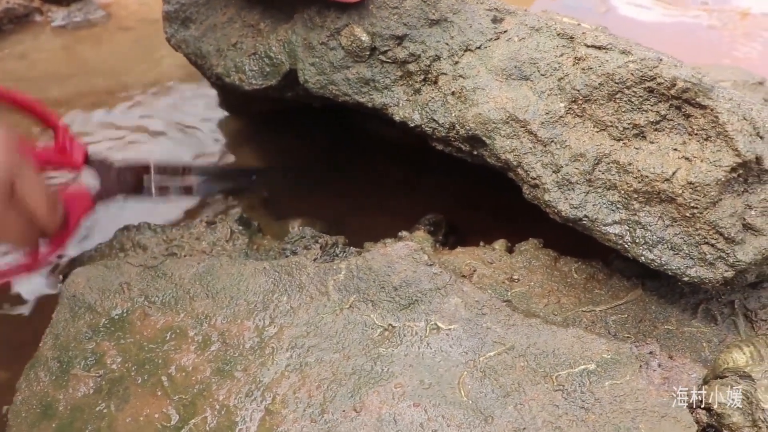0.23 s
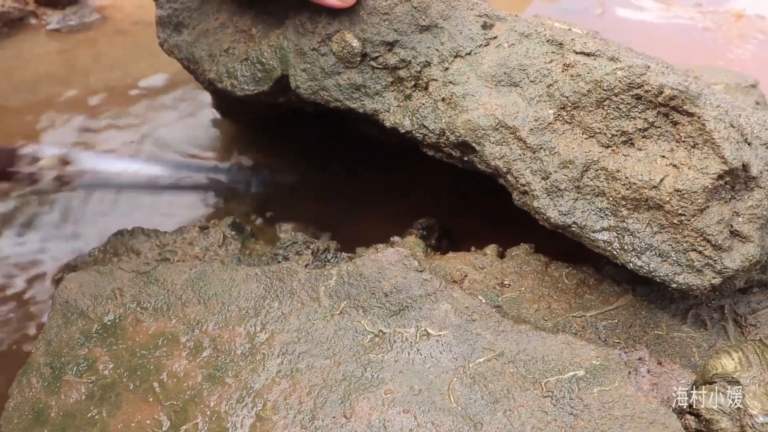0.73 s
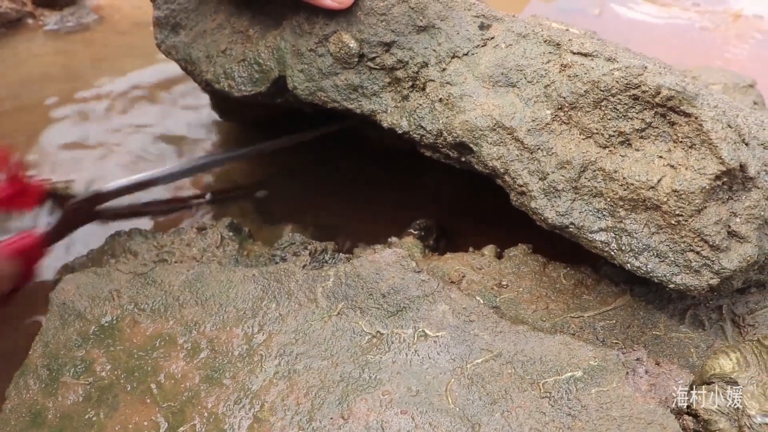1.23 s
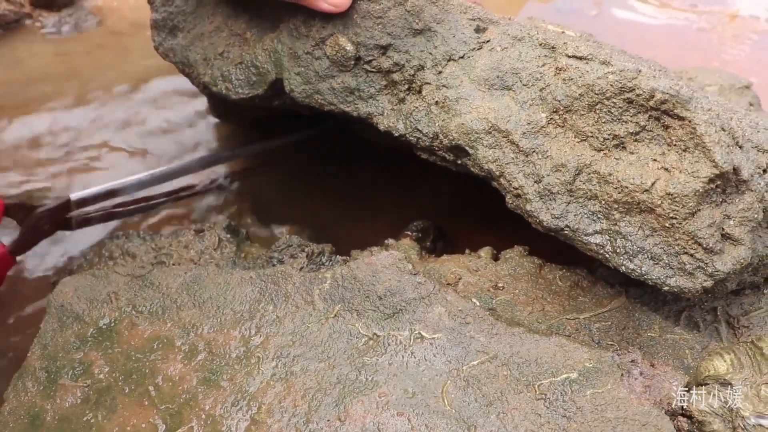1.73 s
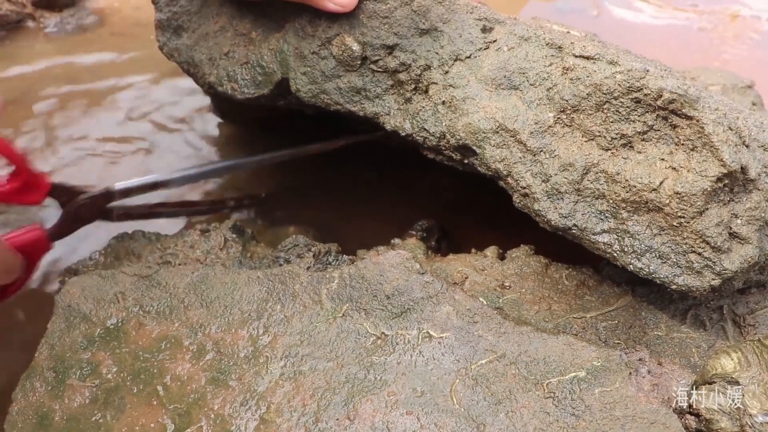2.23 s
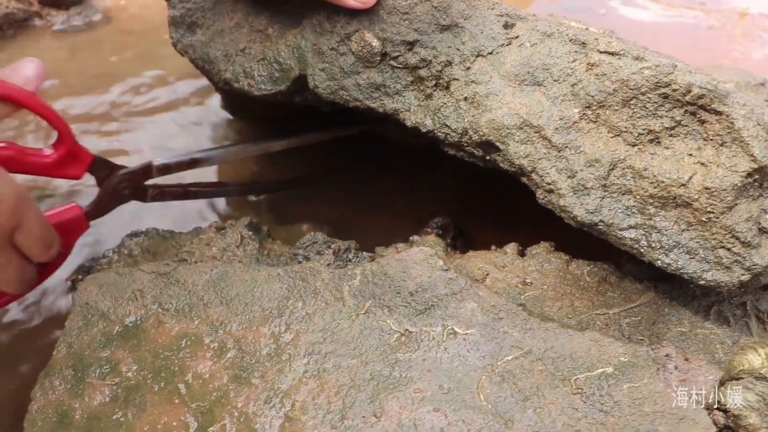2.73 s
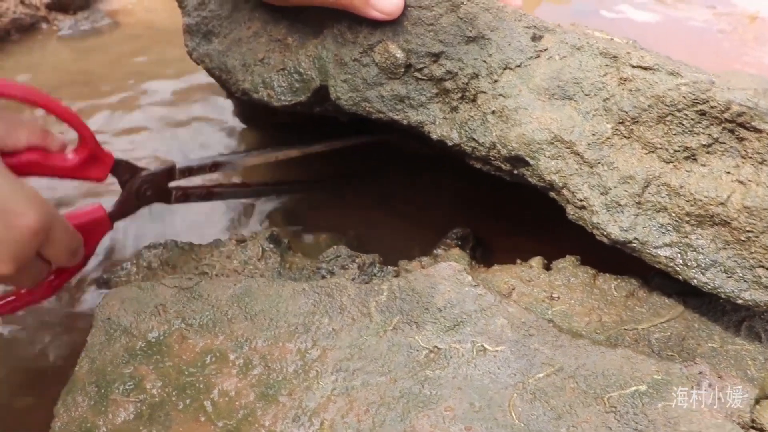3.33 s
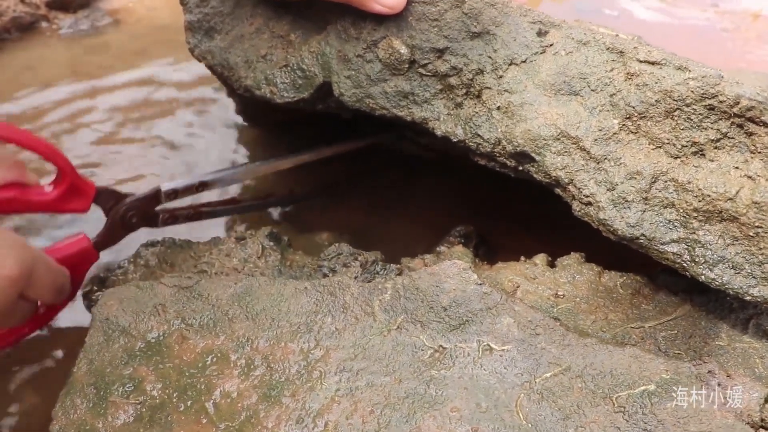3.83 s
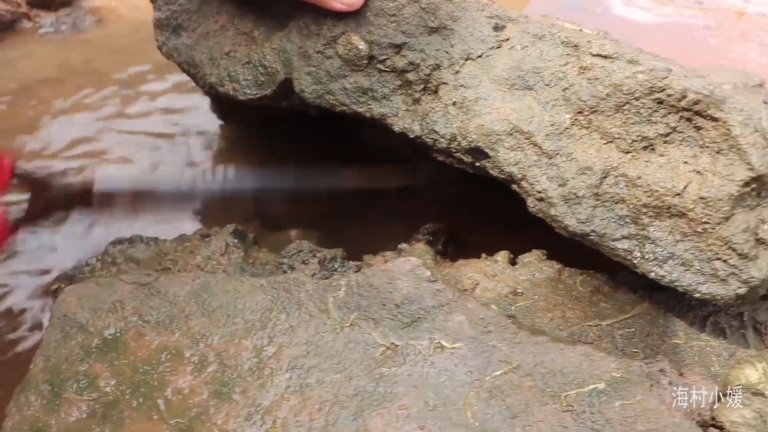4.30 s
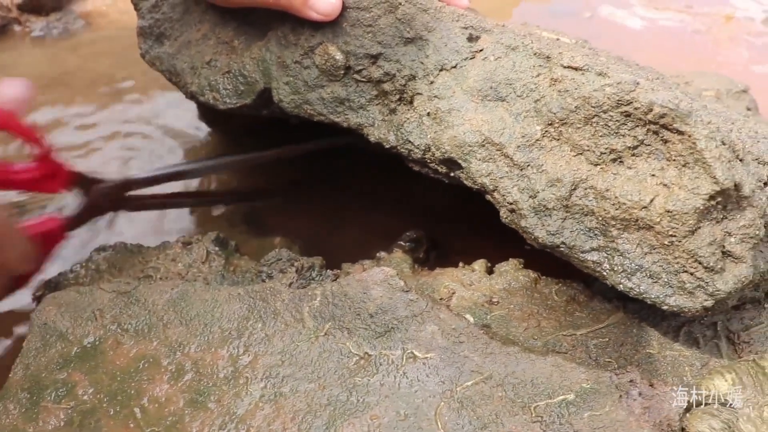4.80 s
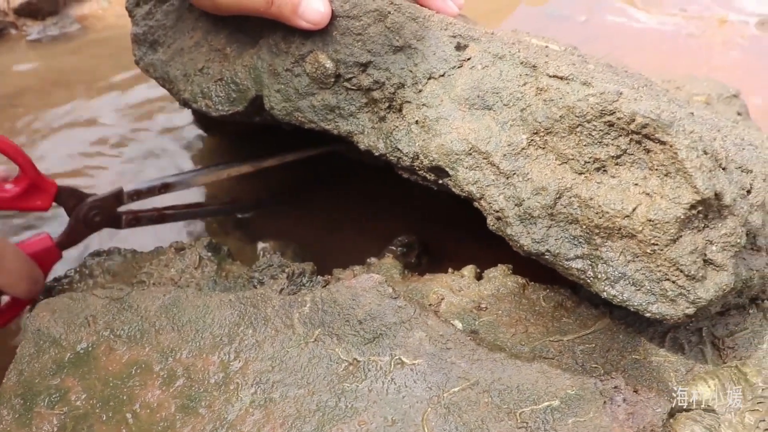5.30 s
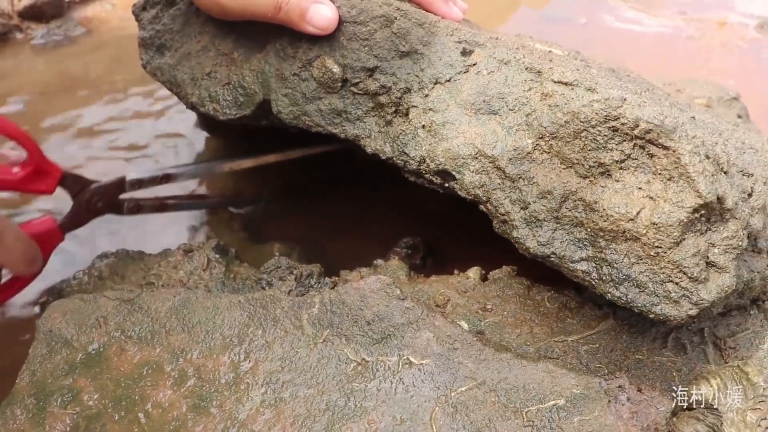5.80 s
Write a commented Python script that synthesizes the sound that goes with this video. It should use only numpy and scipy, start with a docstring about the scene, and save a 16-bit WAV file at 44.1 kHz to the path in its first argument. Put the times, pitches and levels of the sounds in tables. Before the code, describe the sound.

Long steel tongs scrape in short gritty strokes and tick brightly on rock inside a wet hollow, with water trickling, lapping and plopping close by.

```python
"""Long steel tongs probe a water-filled crevice under a lifted stone, heard close by.
From the start, shaped noise gives a faint rumble of the open shore, a murmuring hollow and fizzing wet sand.
Almost at once the tips drag in short strokes (dense decaying grains), then tick on rock (noise bursts with
a ringing pitch). Resonances let the blades ring and the hollow answer these; thumps stir the air below.
The stirred water trickles and laps throughout; clear plops, sines rising in pitch, join from half a second on."""
import sys
import numpy as np
from scipy import signal
from scipy.fft import rfft, irfft, next_fast_len
from scipy.io import wavfile
from scipy.ndimage import uniform_filter1d, map_coordinates

SR = 44100
rng = np.random.default_rng(int(sys.argv[2]) if len(sys.argv) > 2 else 0)


def pcm_store(signal):
    """Save signal as 16-bit PCM."""
    levels = np.round(np.clip(np.atleast_2d(signal), -1, 1) * 32767)
    wavfile.write(sys.argv[1], SR, levels.astype(np.int16).T)


N = 266893

# open-air rumble, spectral density: f/Hz, level/dB per Hz (relative)
SHORE_SPECTRUM = [(20, -16), (35, -10), (85, -3.5), (120, -5.5), (180, -13), (310, -14.5), (450, -19),
                  (700, -20.5), (1200, -22.5), (3000, -26.5), (8000, -39), (12000, -47), (15000, -57),
                  (16000, -60)]
# murmur of the hollow, spectral density: f/Hz, level/dB per Hz (relative)
MURMUR_SPECTRUM = [(380, -40), (440, -5.0), (465, -4), (495, -14.0), (570, -25.5)]
# crushed wet grit, spectral density: f/Hz, level/dB per Hz (relative within a band)
GRIT_SPECTRUM = [(100, -19), (260, -14), (450, -1.5), (760, -9), (1200, 1), (2200, -4), (3200, -3),
                 (5500, -3.5), (8000, -4.5), (11000, -6.5), (13500, -9), (15200, -10), (16000, -45)]
# strokes of the tips through grit: start t/s, length t/s, scrape level/dB halfway,
# swell level/dB from start to end, grinding level/dB relative to the scrape before a common trim
STROKES = [(0.007, 0.2, -35, 12.5, -14), (0.201, 0.095, -23.5, -2, -11), (0.315, 0.027, -37.5, -3, -7),
           (0.362, 0.091, -29.5, 12, -8), (0.478, 0.026, -30, 15, -1.5), (0.545, 0.021, -30, -5, -8),
           (0.582, 0.043, -43.5, -5, -6), (0.636, 0.03, -32, -3, -10.5), (0.68, 0.13, -51.5, -12, -20),
           (1.057, 0.057, -36, -2.5, -7), (1.177, 0.13, -30, -13, -13), (1.351, 0.061, -26.5, 13.5, -9),
           (1.433, 0.099, -35.5, 6, -11), (1.543, 0.047, -25.5, -3.5, -9), (1.618, 0.1, -32, -1, -2),
           (1.734, 0.037, -33.5, 6, -4), (1.822, 0.076, -42, -10, 2.5), (2.11, 0.12, -40, -3.5, -9.5),
           (2.256, 0.061, -41, -5.5, -5), (2.329, 0.054, -34, 0.5, -4), (2.518, 0.1, -37.5, -4, -3.5),
           (2.652, 0.1, -35, -4, -8), (2.815, 0.018, -37, 15, -4.5), (2.866, 0.067, -51.5, 8, -8),
           (2.983, 0.04, -30.5, 2, -8), (3.049, 0.046, -47.5, 21, -1), (3.109, 0.073, -28.5, -8, -6.5),
           (3.177, 0.03, -34.5, -8, -8), (3.244, 0.076, -43, 9, -0.5), (3.383, 0.032, -38, 3, 1),
           (3.464, 0.17, -44.5, 3, -6), (3.649, 0.018, -32.5, 13, -3), (3.698, 0.044, -31.5, -4.5, -5),
           (3.852, 0.056, -48, -6, -1), (4.215, 0.058, -27.5, 0, -7), (4.279, 0.035, -21, -1, -5),
           (4.36, 0.064, -48, 2, 4), (4.441, 0.039, -31.5, 8.5, -4.5), (4.553, 0.11, -41, 13, -11.5),
           (4.675, 0.011, -26.5, 5, -13), (4.728, 0.12, -34, -10, -11), (4.851, 0.094, -24, 3, -8.5),
           (5.007, 0.11, -34, 22, -6), (5.13, 0.12, -40, -28, -2.5), (5.316, 0.076, -35.5, -8.5, -1),
           (5.468, 0.0064, -47.5, 4, 2), (5.63, 0.013, -36.5, 9, 3), (5.695, 0.033, -36, 24.5, 2),
           (5.913, 0.067, -33.5, -12, -2), (5.981, 0.066, -26, -0.5, -5)]
# excitation of the hollow under the stone: t/s, level/dB relative to the scrape, or to the blow before a trim
HOLLOW_DRIVE = [(0, -20), (0.5, -11), (1.0, -45), (2.8, -44), (3.1, -12), (3.7, -12), (4.3, -13),
                (4.6, -40), (5.0, -31), (5.4, -5), (6.05, -16)]
# air under the stone, spectral density: f/Hz, level/dB per Hz (relative)
HOLLOW_AIR_SPECTRUM = [(270, -35), (380, -8.5), (465, -5.5), (530, -4.5), (680, -22)]
# blows of the tips on rock or grit: t/s, level/dB before the band gain, low knock level/dB relative to it,
# f/Hz of the pitch that rings most
CONTACTS = [(0.0482, -31.5, -4, 7000), (0.084, -19, -9, 7770), (0.4575, -23, -3, 8300),
            (0.508, -24, -2, 6250), (0.5119, -21, -13, 3900), (0.5573, -28.5, -1, 5000),
            (0.9058, -35, -9, 6000), (1.0167, -26.5, -4, 4970), (1.0458, -25.5, -2.5, 4790),
            (1.1745, -27.5, 0, 7350), (1.1913, -21.5, -7.5, 5380), (1.2318, -21.5, -14, 5100),
            (1.274, -24, -8, 5100), (1.285, -13, -13, 7300), (1.3733, -19.5, -17, 5500),
            (1.4084, -25, 0, 8300), (1.461, -29.5, -0.5, 10900), (1.5079, -24.5, -15, 10500),
            (1.5237, -20, -11, 11800), (1.5555, -19.5, -16, 11600), (1.63, -15, -15.5, 7030),
            (1.637, -24, -10, 4930), (1.692, -16, -3, 6700), (1.6995, -18.5, -7.5, 5850),
            (1.9147, -13, -9, 7600), (1.933, -26, -11, 5500), (1.9832, -29, -9.5, 9800),
            (1.9996, -25, -17, 8540), (2.0463, -40.5, -19, 9500), (2.1165, -32.5, 5.5, 8100),
            (2.1893, -33, 6.5, 5970), (2.2069, -32, -4, 8600), (2.3197, -30.5, 4, 6600),
            (2.344, -19, -8, 9250), (2.4855, -25, -7, 5300), (2.5155, -24.5, -0.5, 4830),
            (2.648, -31, 1, 2950), (2.6682, -27, -12, 5030), (2.8328, -24, -12, 7000),
            (3.147, -25, -2, 11000), (3.1807, -22, -5, 4490), (3.2674, -35.5, -6, 8800),
            (3.292, -38, -13, 8400), (3.3408, -34, -4, 6700), (3.4003, -21, -9, 7320),
            (3.4464, -15.5, -13, 8600), (3.5363, -32.5, -6, 11700), (3.5828, -27.5, 1, 9750),
            (3.6235, -31.5, 0.5, 8400), (3.6552, -26, -2.5, 7800), (3.6948, -23, -14, 12500),
            (3.815, -38.5, 1, 6600), (3.8256, -32, -4.5, 6430), (3.9015, -30.5, -2, 6400),
            (3.914, -34.5, -20, 8700), (3.9467, -35, -9, 7300), (3.99, -40, -9, 7900),
            (4.08, -21, -13, 6520), (4.129, -31, -5, 6300), (4.1451, -28, -11, 10800),
            (4.1658, -17.5, -17, 8730), (4.24, -16, -11.5, 7200), (4.3187, -21, -12, 7230),
            (4.4446, -15, -9, 5150), (4.538, -22, -7, 9100), (4.5483, -27.5, -2.5, 3760),
            (4.6151, -32, 4.5, 5430), (4.6787, -20.5, -10.5, 8970), (4.724, -25, -6.5, 8500),
            (4.7908, -24, -13, 6330), (4.87, -26.5, -4, 5540), (4.903, -23.5, -4, 7970),
            (4.9394, -22, -3, 9900), (4.9955, -23, -9.5, 11700), (5.2531, -38, 6, 4800),
            (5.312, -24, -4.5, 7200), (5.5568, -39, 4, 6100), (5.564, -39, -9, 5220),
            (5.6375, -23, -6, 4720), (5.7278, -22, -14, 7700), (5.7613, -30, -3.5, 7200),
            (5.8246, -21.5, -6, 8600), (5.887, -29.5, -2.5, 8700), (5.918, -19, -4, 7000),
            (5.9819, -23, -0.5, 11800), (6.0018, -22, 5, 3080), (6.009, -19, -12, 2980),
            (6.022, -22, -15, 2950)]
# blow on rock or grit, spectral density: f/Hz, level/dB per Hz (relative within a band)
TICK_SPECTRUM = [(100, -33), (300, -7), (460, -3), (720, -7), (1200, 4.5), (2200, 0), (4000, -1),
                 (8300, 1.5), (11000, -3), (13500, -4.5), (15200, -5), (16500, -59)]
# low, middle and high bands (knock, clink and crack of a blow): lower f/Hz, upper f/Hz
BANDS = [(20, 2200), (2200, 7000), (7000, 20000)]
# gain level/dB and 60 dB decay t/s of a blow in each band
BAND_GAINS_DB, BAND_T60S = [-6.0, -4.0, -4.0], [0.0749, 0.0325, 0.01]
# modes of the steel blades: f/Hz, width f/Hz, level/dB relative to the direct sound
BLADE_MODES = [(1320, 90, -12.5), (1960, 50, -9.5), (2935, 30, -4), (3930, 26, -23), (4600, 50, -6),
               (5090, 60, -10), (5600, 77, -6), (6610, 27, -29), (7400, 32, -41), (8150, 95, -15),
               (8650, 130, -14), (10700, 90, -3.5), (12560, 79, 6.5), (13700, 30, 1), (14700, 90, -1)]
# modes of the hollow under the stone: f/Hz, width f/Hz, level/dB relative to the direct sound
HOLLOW_MODES = [(380, 29, -10), (473, 49, -3.5), (670, 13, -45.5), (859, 85, 1.5), (1080, 99, -13.5)]
# air pockets in the stirred water: t/s, initial f/Hz, tone level/dB, 60 dB decay t/s
BUBBLES = [(0.496, 416, -33, 0.075), (0.512, 365, -31, 0.054), (0.899, 303, -34.5, 0.059),
           (0.925, 268, -33, 0.038), (1.018, 4800, -15.5, 0.019), (1.045, 4800, -17, 0.028),
           (1.055, 3450, -12.5, 0.022), (1.736, 1890, -25, 0.05), (1.753, 1380, -22, 0.035),
           (1.757, 1700, -24, 0.035), (1.783, 1770, -21, 0.013), (1.83, 1900, -17, .018),
           (1.836, 1945, -13, 0.026), (1.844, 1930, -20, 0.024), (1.852, 2015, -21, 0.027),
           (3.176, 1260, -15.5, 0.045), (3.537, 1170, -25, 0.027), (3.582, 1176, -15, 0.022),
           (3.686, 586, -31, 0.041), (3.751, 666, -29.5, 0.039), (4.318, 1450, -18, 0.02),
           (4.358, 5070, -29, 0.01), (4.421, 4550, -23, .011), (4.4759, 1680, -10, 0.033),
           (4.481, 630, -16, 0.11), (5.722, 1280, -16.5, 0.022), (5.92, 1085, -11, 0.026)]
# left-right likeness of noise: f/Hz, correlation [1]
LIKENESS = [(100, 0.93), (550, 0.89), (1000, 0.75), (1500, 0.5), (2200, 0.036), (3200, -0.1),
            (8000, -0.072), (15000, -0.19)]
# sideways balance: f/Hz, left minus right level/dB
LEFT_BALANCE = [(100, 1.4), (1300, 1.5), (2400, 2), (4300, 2.5), (5300, 3.5), (8200, 4.5), (12000, 2),
                (14500, 5.5)]

BITE_S, RELEASE_DB_PER_S = 0.0075, 807  # onset and release of every stroke
# a harder contact rings higher and cracks more than it clinks; at EVEN_HZ the two are equal
EVEN_HZ, BRIGHT_DB_PER_OCT = 6580, 10
PATCHY_DB = 4.5  # rms depth of the shifting spectral peaks, before they are limited to twice this
TOP_HZ = 16300  # upper band limit


def amp(db):
    """Definition of the decibel: the amplitude ratio for a level."""
    return 10 ** (np.asarray(db) / 20)


def unit(x):
    """Normalization by effective value: x scaled to rms 1."""
    return x / np.sqrt(np.mean(x ** 2) + 1e-20)


def along(points, hz):
    """Interpolation on a logarithmic frequency axis through (f/Hz, value) points."""
    f, value = np.transpose(points)
    return np.interp(np.log(hz + 1), np.log(f + 1), value)


def wobble(rate):
    """Slow random modulation: a smooth curve through random knots, rate of them a second."""
    knots = rng.standard_normal(int(N * rate / SR) + 4)
    return map_coordinates(knots, [np.arange(N) * rate / SR])


def filtered(x, response):
    """Linear filtering: the spectrum of x times a complex response of frequency."""
    n = x.shape[-1]
    padded = next_fast_len(n + 8192)
    return irfft(rfft(x, padded) * response(np.fft.rfftfreq(padded, 1 / SR)), padded)[..., :n]


def add(track, s, sound):
    """Superposition: a sound is summed into a track from time s, or from 0 if s is negative."""
    part = track[..., max(round(s * SR), 0):][..., :sound.shape[-1]]
    part += sound[..., :part.shape[-1]]


def noise(spectrum, band=(0, SR), patchy_db=0):
    """Partial correlation: stereo band noise of rms 1, alike in the bass, with optional shifting peaks and dips."""
    def mid_side(hz):
        turn = np.arccos(np.clip(along(LIKENESS, hz), -1, 1)) / 2
        in_band = (hz >= band[0]) * (hz < band[1])
        return amp(along(spectrum, hz)) * in_band * [np.cos(turn), np.sin(turn)]

    cells = signal.stft(rng.standard_normal((2, N)), nperseg=512)[2]
    field = uniform_filter1d(rng.standard_normal(cells.shape), size=4, axis=1)  # smooth over frequency
    field = uniform_filter1d(field, size=14, axis=2)  # smooth over time
    gain = amp(patchy_db * np.clip(unit(field), -2, 2))
    patchy = signal.istft(cells * gain, nperseg=512)[1][:, :N]
    mid, side = filtered(patchy, mid_side)
    return unit(np.array([mid + side, mid - side]))


def grains(rate, spread_db, t60):
    """Shot noise: the rms-1 envelope of many small fractures, each sudden and quickly dying."""
    sizes = amp(spread_db * np.clip(rng.standard_normal(N), -2, 2))
    energy = (rng.random(N) < rate / SR) * sizes ** 2
    t = np.arange(SR // 10) / SR
    decay = amp(-60 * t / t60) ** 2
    return unit(np.sqrt(np.abs(signal.fftconvolve(energy, decay)[:N])))


def shore(floor_db=-50, fizz_db=-55, murmur_db=-59):
    """Broadband radiation: a low open-air rumble, the hollow murmuring with the water, wet sand fizzing faintly."""
    air = amp(floor_db + 0.21 * wobble(4.07)) * noise(SHORE_SPECTRUM)
    murmur = amp(murmur_db + 2.0 * wobble(7.8)) * noise(MURMUR_SPECTRUM)
    stir = amp(3 * wobble(8))
    sand = noise(GRIT_SPECTRUM, patchy_db=PATCHY_DB) * grains(rate=650, spread_db=12.0, t60=0.085)
    return air + murmur + amp(fizz_db) * stir * sand


def drag(length, swell_db):
    """Frictional envelope: a stroke bites, swells or slackens while the hand moves, then dies away."""
    t = np.arange(int((length + .15) * SR)) / SR
    moving = t - BITE_S
    swell = swell_db * (np.clip(moving / length, 0, 1) - .5)
    release = RELEASE_DB_PER_S * np.maximum(moving - length, 0)
    return np.minimum(t / BITE_S, 1) * amp(swell - release)


def scraping(grind_db=-2, catch_db=1.24):
    """Stick-slip and fracture: dragged tips crush sand, catch and slip; pressing harder adds low grinding."""
    t, scrape, grind = np.arange(N) / SR, np.zeros(N), np.zeros(N)
    for s, length, db, swell_db, low_db in STROKES:
        level = amp(db) * drag(length, swell_db)
        add(scrape, s - BITE_S, level)
        add(grind, s - BITE_S, level * amp(low_db))
    # fine sand, with a few coarse grains that snap singly
    fine = grains(rate=1500, spread_db=4.5, t60=.018)
    coarse = grains(rate=130, spread_db=4, t60=.009)
    crunch = unit(np.hypot(fine, amp(-6) * coarse) * amp(catch_db * wobble(70)))
    # the colour shifts as the contact point travels along blade and rock
    low, middle, high = [noise(GRIT_SPECTRUM, band, PATCHY_DB) * unit(amp(1.92 * wobble(110)))
                         for band in BANDS]
    brightness = amp(-1.0 + 0.85 * wobble(17))
    hiss = unit(middle + brightness * high)
    # even light dragging sets the air under the stone booming
    boom = amp(np.interp(t, *np.transpose(HOLLOW_DRIVE))) * noise(HOLLOW_AIR_SPECTRUM)
    return crunch * (scrape * (hiss + boom) + amp(grind_db) * grind * low)


def contacts(lead_db=-21, lead_t60=0.012, tail_db=-26, tail_t60=0.08, ring_db=4.5, ring_t60=0.017,
             rise_s=0.0009):
    """Impact: the tip grazes, then strikes; the blow dies quickly and the rock walls scatter a faint tail."""
    out, lead = np.zeros((2, N)), SR // 150
    t = np.arange(-lead, SR // 8) / SR
    blow = (t >= 0) & (t < .008)
    for k, band in enumerate(BANDS):
        source = noise(TICK_SPECTRUM, band, PATCHY_DB)
        direct = amp(-60 * abs(t) / BAND_T60S[k])
        tail = amp(tail_db - 60 * abs(t) / tail_t60)
        graze = amp(lead_db - 60 * abs(t) / lead_t60)
        shape = np.maximum(graze, np.hypot(direct, tail) * np.clip(t / rise_s, 0, 1))
        for (s, db, knock_db, hz), (place, *phases) in zip(CONTACTS, rng.random((len(CONTACTS), 3))):
            bright_db = BRIGHT_DB_PER_OCT * np.log2(hz / EVEN_HZ)
            levels = db + np.array([knock_db, -bright_db / 2, bright_db / 2])  # knock, clink, crack
            tick = source[:, int(place * (N - len(t))):][:, :len(t)] * shape
            tick = tick / np.sqrt(np.mean(tick[:, blow] ** 2))
            if band[0] <= hz < band[1]:
                # the spot struck decides which pitch stands out; high ones reach the sides out of step
                offset = (k > 0) * np.array(phases)[:, None] / 2
                ring = np.sin(2 * np.pi * (hz * t + offset))
                tick = tick + amp(ring_db) * ring * (t >= 0) * amp(-60 * abs(t) / ring_t60)
            add(out, s - lead / SR, tick * amp(levels[k] + BAND_GAINS_DB[k]))
    return out


def thumps(thump_db=3.0, thump_t60=0.057, rise_s=0.0018):
    """Impulsive cavity excitation: each contact thumps the air as strongly as the tongs reach the hollow."""
    level, t = np.zeros(N), np.arange(SR // 8) / SR
    shape = np.minimum(t / rise_s, 1) * amp(-60 * t / thump_t60)
    for s, db, *_ in CONTACTS:
        drive_db = np.interp(s, *np.transpose(HOLLOW_DRIVE))
        add(level, s, amp(db + thump_db + drive_db) * shape)
    return level * noise(HOLLOW_AIR_SPECTRUM)


def resonate(x, modes):
    """Modal superposition: the direct sound plus damped second-order resonances."""
    def response(f):
        return 1 + sum(amp(db) * 1j * f * width / (centre * centre - f * f + 1j * f * width)
                       for centre, width, db in modes)
    return filtered(x, response)


def bubble(hz, t60, rise=0.1, attack_s=0.00033, splash_db=-8.5, splash_t60=0.024):
    """Bubble resonance: an air pocket breaks off with a tiny splash and rings, rising as it nears the surface."""
    t = np.arange(SR // 6) / SR
    pitch = hz * (1 + rise * np.minimum(t / t60, 1))
    tone = np.sin(2 * np.pi * np.cumsum(pitch) / SR) * amp(-60 * t / t60)
    width = min(.35 * hz, 420)
    splash = unit(filtered(rng.standard_normal(len(t)), lambda f: np.exp(-((f - hz) / width) ** 2)))
    return (tone + splash * amp(splash_db - 60 * t / splash_t60)) * (1 - np.exp(-t / attack_s))


def water(count=90, small_hz=1100, small_t60=0.019, lap_hz=330, lap_t60=0.054):
    """Bubble ensemble: clear plops, tiny bubbles stirred up by the strokes, and ripples lapping at the stone."""
    out = np.zeros(N)
    for s, hz, db, t60 in BUBBLES:
        add(out, s, amp(db) * bubble(hz, t60))
    for which, when, pitch, size in rng.random((count, 4)):
        start, length, *_ = STROKES[int(which * len(STROKES))]
        hz = small_hz * 2 ** (2.6 * (pitch - .5))
        add(out, start + when * length, amp(-46.5 + 5.0 * size) * bubble(hz, small_t60))
    for when, pitch, size in rng.random((count // 2, 3)):
        hz = lap_hz * 2 ** (1.2 * (pitch - .5))
        add(out, when * N / SR, amp(-40.7 + 7.3 * size) * bubble(hz, lap_t60, attack_s=0.0068))
    return out


def scene():
    """Source and resonator: blows and drags ring the blades and the hollow, over the water and the shore."""
    background = shore()
    tongs = resonate(scraping() + contacts() + thumps(), BLADE_MODES + HOLLOW_MODES)
    # the tongs work left of centre; the whole sound shares the balance
    return filtered(tongs + water() + background,
                    lambda hz: amp(np.outer([.5, -.5], along(LEFT_BALANCE, hz))))


def record(dry):
    """Saturation and band limiting: the highest peaks are rounded off, then a steep low-pass acts at TOP_HZ."""
    rounded = dry / (1 + dry ** 6) ** (1 / 6)
    return filtered(rounded, lambda hz: 1 / np.sqrt(1 + (hz / TOP_HZ) ** 160))


dry = scene()
out = record(dry)
pcm_store(out)
```